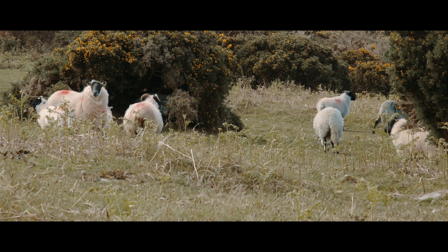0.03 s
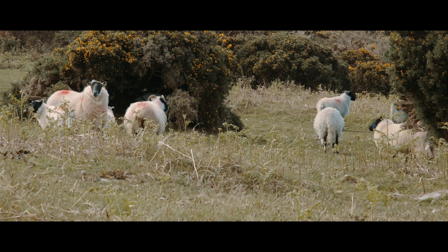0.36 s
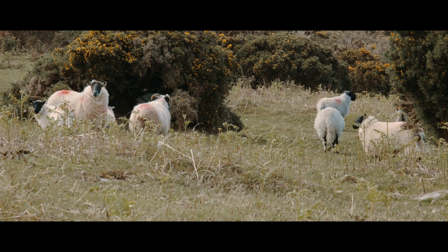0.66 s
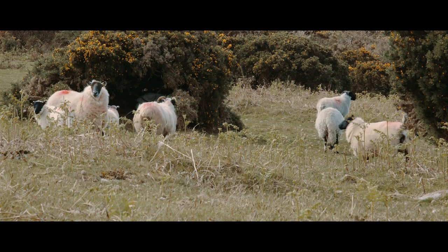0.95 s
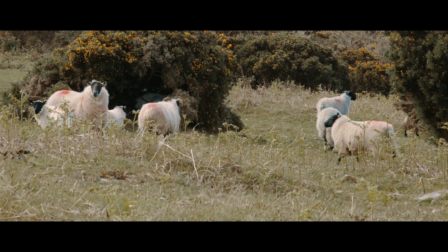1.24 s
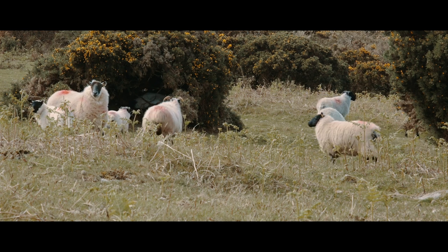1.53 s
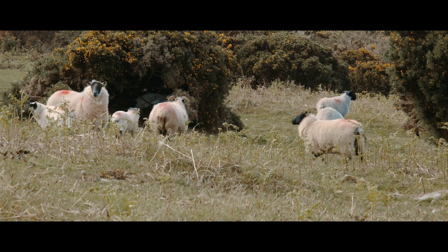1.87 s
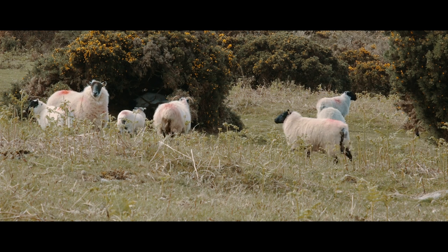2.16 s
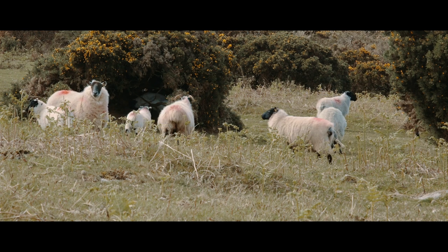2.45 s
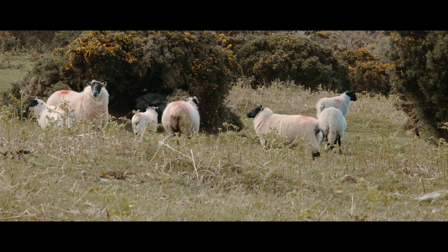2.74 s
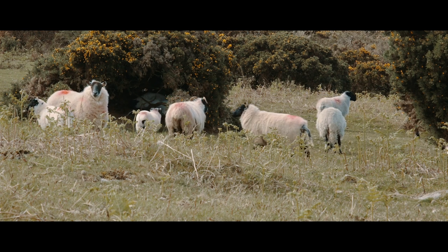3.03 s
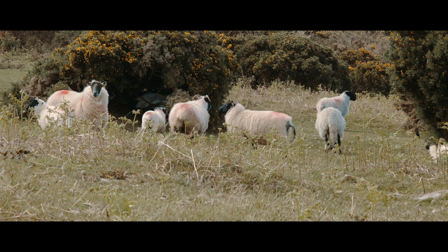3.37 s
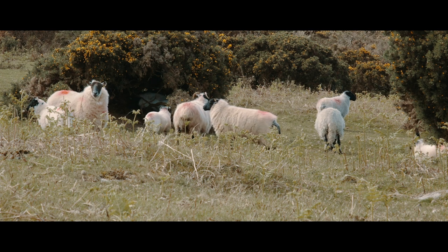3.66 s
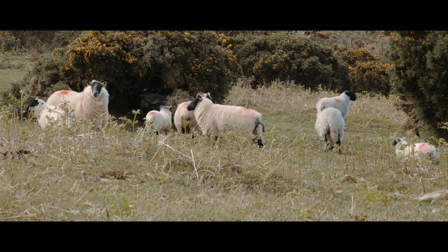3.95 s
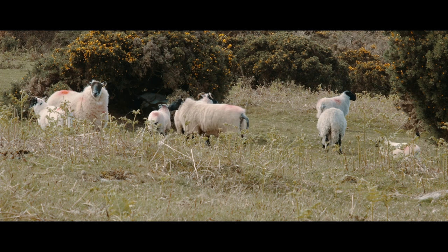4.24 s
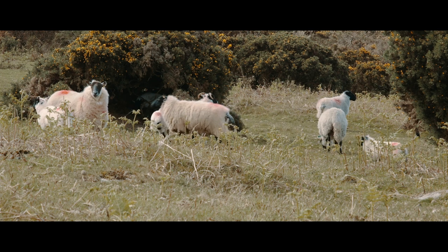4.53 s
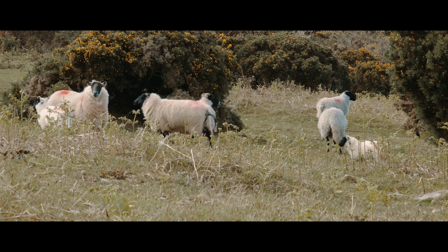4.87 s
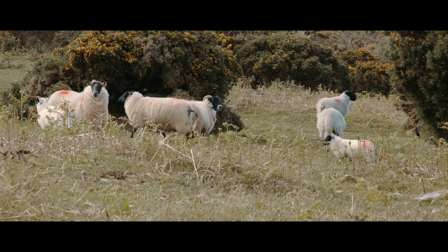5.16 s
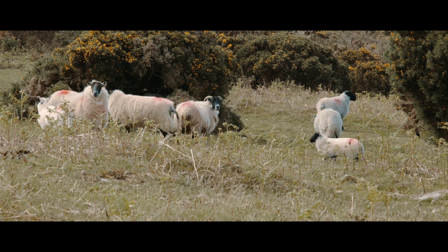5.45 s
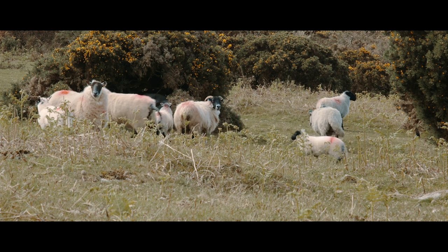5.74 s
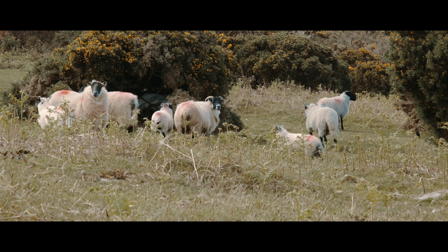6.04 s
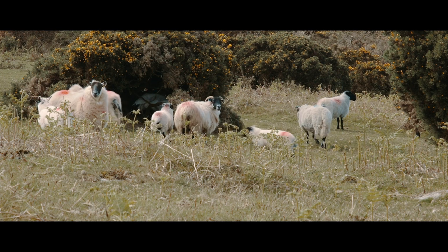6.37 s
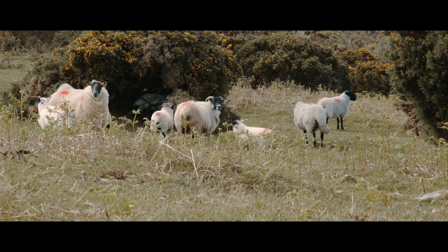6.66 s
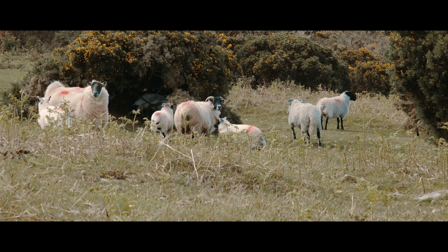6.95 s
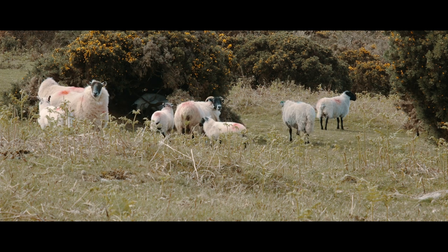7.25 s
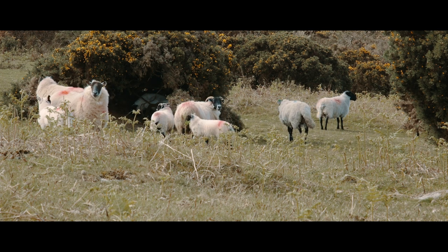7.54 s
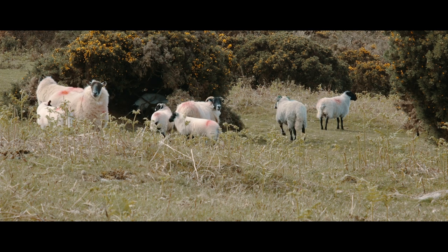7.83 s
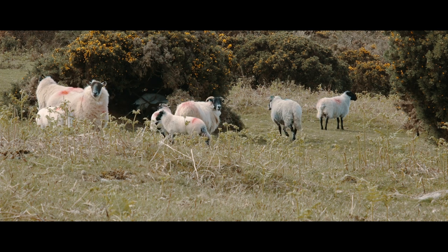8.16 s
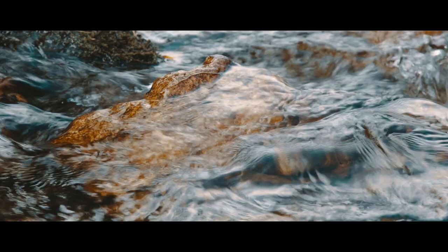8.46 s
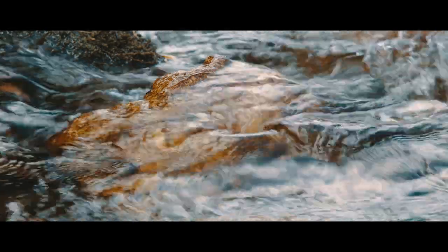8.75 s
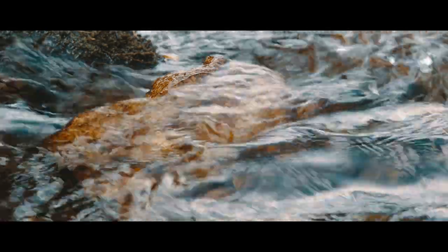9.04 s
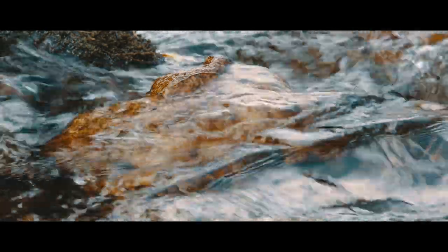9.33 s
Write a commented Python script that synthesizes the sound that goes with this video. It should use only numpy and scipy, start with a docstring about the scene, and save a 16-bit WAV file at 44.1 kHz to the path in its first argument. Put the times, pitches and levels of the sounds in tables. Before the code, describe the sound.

Sheep call in the open air over a faint hush, with small birds whistling near and far. Short mutters lead to two wavering bleats, one bright and one low, while a far sheep calls dully behind them. A lamb then bleats loudly, fairly near the microphone, followed by quick bird trills. Near the end these give way to a close stream gurgling over stones with small splashes.

```python
"""Sheep and birds on a moor

Sheep bleat in the open air while small birds whistle from the bushes and a far sheep keeps calling.
Each bleat is a string of throbs: quick puffs from the vocal folds ring in the throat, with slow
creaks in between. Near the end the animals fall silent and a shallow stream fades in,
its trapped air ringing as bubbles and its drops splashing over the stones."""
import sys
import numpy as np
from scipy import signal
from scipy.fft import rfft, irfft
from scipy.io import wavfile

SR = 44100
rng = np.random.default_rng(int(sys.argv[2]) if len(sys.argv) > 2 else 0)


def unload_audio(sound):
    """Save the sound as a 16-bit wav file, at the path given as the first command line argument."""
    columns = np.transpose(np.atleast_2d(sound))
    # keep every value between -1 and 1, then stretch to whole-number steps
    steps = np.round(np.clip(columns, -1, 1) * 32767)
    wavfile.write(sys.argv[1], SR, steps.astype(np.int16))


N = 423360
TIME = np.arange(N) / SR
STREAM_START_S = 8.15


def from_db(db):
    """Turn decibels into a number to multiply by."""
    return 10 ** (np.asarray(db) / 20)


def rms_one(x):
    """Scale a sound to an average power of 1."""
    return x / np.sqrt(np.mean(x ** 2) + 1e-20)


def add(out, s, sound):
    """Mix a sound in at s seconds."""
    i = int(np.clip(s * SR, 0, N))
    out[i:i + len(sound)] += sound[:N - i]


def seconds(length):
    """The time of each sample in a sound of this length."""
    return np.arange(int(length * SR)) / SR


def sine(hz):
    """A pure tone that follows a changing pitch."""
    return np.sin(2 * np.pi * np.cumsum(hz) / SR)


def drift(rate, size=N):
    """A random wander, roughly between -1 and 1, with `rate` new values a second."""
    return np.interp(np.arange(size) / SR * rate, np.arange(4096), rng.standard_normal(4096))


def colour(x, spectrum):
    """Make each frequency louder or softer along a smooth curve."""
    hz, db = np.transpose(spectrum)
    bins = np.maximum(np.fft.rfftfreq(N, 1 / SR), 1)
    return irfft(rfft(x) * from_db(np.interp(np.log(bins), np.log(hz), db)), N)


def resonance(x, hz, width):
    """Keep a band of frequencies around hz."""
    r = np.exp(-np.pi * width / SR)
    gain = (1 - r * r) / 2
    return signal.lfilter([gain, 0, -gain], [1, -2 * r * np.cos(2 * np.pi * hz / SR), r * r], x + 1e-18)


def noise_bursts(clicks, fade_s):
    """Turn each click into a short, fading hiss."""
    envelope = signal.lfilter([1], [1, -np.exp(-1 / (fade_s * SR))], clicks + 1e-18)
    return envelope * rng.standard_normal(N)


def open_air(x, wet_db, t60):
    """Bushes and slopes scatter a thin echo, which falls by 60 dB in t60 seconds."""
    t = seconds(.6)
    tail = rng.standard_normal(len(t)) * from_db(-60 * t / t60) * (1 - np.exp(-t / 0.014))
    return x + from_db(wet_db) * signal.fftconvolve(x, tail / np.sqrt(np.sum(tail ** 2)))[:N]


# The tone of still air and a wash of distant birdsong: f/Hz, relative level/dB
AIR_SPECTRUM = [(15, -47), (25, -16.5), (55, -5.5), (126, -2.5), (160, -5.5), (183, -7), (389, -11.5),
                (631, -11), (741, -10.5), (1110, -11), (1200, -13.5), (1710, -18), (2170, -18.5),
                (4870, -27), (7100, -28.5), (15500, -32.5)]


def moor_air(level_db=-55, dip_db=-4):
    """A soft, low hush that drops a little as the stream comes in."""
    hush = rms_one(colour(rng.standard_normal(N), AIR_SPECTRUM))
    return from_db(level_db + np.interp(TIME, [8.2, 8.8], [0, dip_db])) * hush


def warble(size, hz):
    """A ragged shake of the pitch: its speed and depth keep changing."""
    rate = hz * np.exp(.4 * drift(70, size))
    depth = 1 + .35 * drift(90, size)
    grit = .4 * drift(450, size)
    return depth * sine(rate) + grit


def whistles(notes, warble_hz=70, flutter_db=3.5, attack_s=0.0049, release_s=0.0057):
    """Each bird note is a pure tone gliding through three pitches while its level flutters."""
    out = np.zeros(N)
    for start, length, first_hz, middle_hz, last_hz, db, depth_hz in notes:
        t = seconds(length)
        glide = np.polyval(np.polyfit([0, .5, 1], [first_hz, middle_hz, last_hz], 2), t / length)
        pitch = glide + depth_hz * warble(len(t), warble_hz)
        level = from_db(db + flutter_db * drift(133, len(t)))
        envelope = np.minimum(t / attack_s, 1) * np.minimum((length - t) / release_s, 1)
        add(out, start, np.sqrt(2) * level * envelope * sine(pitch))
    return out


# How loud the distant birds are over time: t/s, level/dB
CHORUS_LEVELS = [(0, -61), (1, -61), (3, -60), (4.2, -75.5), (5, -56.5), (6.3, -63.5), (8.2, -69)]


def far_birds(spread_db=3, pitch_hz=3400, count=220):
    """Faint chirps from all over the moor, busiest at first."""
    notes = []
    for when, length, height, bend, slope, loud in rng.random((count, 6)):
        start = 8.2 * when ** 1.4
        hz = pitch_hz * 2 ** (.7 * (height - .5))
        glide = hz * (.75 + .5 * slope), hz * (.9 + .2 * bend), hz * (1.25 - .5 * slope)
        db = np.interp(start, *np.transpose(CHORUS_LEVELS)) + spread_db * (2 * loud - 1)
        notes.append((start, .02 + 0.049 * length, *glide, db, 70))
    return whistles(notes)


def throat(pulses, modes, top_hz):
    """Puffs of air make the throat ring at its own frequencies; little passes above top_hz."""
    bins = np.fft.rfftfreq(4096, 1 / SR)
    power = sum(from_db(2 * db) / (1 + ((bins - hz) / width) ** 2) ** 2.6 for hz, width, db in modes)
    power = power / (1 + (bins / top_hz) ** 16) + 1e-9
    # shape the ring so that it strikes at once and then dies away (minimum phase)
    cepstrum = irfft(np.log(power))
    ring = irfft(np.exp(rfft(cepstrum * (np.arange(len(cepstrum)) < len(bins)))))
    ring /= np.sqrt(np.sum(ring ** 2) * 200 / SR)  # 200 unit pulses a second give a power near 1
    return signal.fftconvolve(pulses, ring)[:N]


# Where the far sheep's throat rings: f/Hz, width/Hz, level/dB
FAR_SHEEP_THROAT = [(994, 71, 0.56), (1660, 150, 0.56), (1970, 92, 6.2)]
# Its calls: t/s, level/dB
FAR_SHEEP_CALLS = [(1.85, -52.5), (2.69, -54.5), (3.59, -56), (4.62, -54)]


def far_sheep(waver=.016, length_s=0.42, pitch_hz=147, scoop_hz=16, scoop_s=.05, sag_hz=17,
              attack_s=0.021, release_s=0.074):
    """A plain call that slides up to its pitch and sags, dulled by distance."""
    out, t = np.zeros(N), seconds(length_s)
    pitch = pitch_hz - scoop_hz * np.exp(-t / scoop_s) - sag_hz * (t / length_s) ** 2
    envelope = np.minimum(t / attack_s, 1) * np.minimum((length_s - t) / release_s, 1)
    for start, db in FAR_SHEEP_CALLS:
        cycles = np.cumsum(pitch * (1 + waver * drift(90, len(t)))) / SR
        pulses = np.diff(np.floor(cycles), prepend=0)  # one puff per cycle
        add(out, start, pulses * from_db(db) * envelope)
    return throat(out, FAR_SHEEP_THROAT, top_hz=2480)


def bubble(hz, t60, rise):
    """An air pocket rings and climbs in pitch as it nears the surface."""
    t = seconds(t60)
    return sine(hz * (1 + rise * t / t60)) * from_db(-60 * t / t60) * (1 - np.exp(-t * hz))


def bubbling(low_hz, high_hz, cycles, rise, spread_db, count):
    """Bubbles of all sizes, born at random while the stream runs."""
    out = np.zeros(N)
    for when, size, loud, life in rng.random((count, 4)):
        start = STREAM_START_S + when * (N / SR - STREAM_START_S)
        hz = low_hz * (high_hz / low_hz) ** size
        strength = hz * from_db(spread_db * min(-np.log(1 - loud), 4))
        add(out, start, strength * bubble(hz, cycles * (.5 + life) / hz, rise * life))
    # as strong as plain white noise is between these two frequencies
    return out / np.std(out[int(STREAM_START_S * SR):]) * np.sqrt(2 * (high_hz - low_hz) / SR)


def droplets(per_s=500, spread_db=5, fade_s=0.00085):
    """Flung drops tick on the water, a few of them loudly."""
    sizes = from_db(spread_db * np.minimum(rng.exponential(1, N), 4))
    ticks = noise_bursts(sizes * (rng.random(N) < per_s / SR), fade_s)
    return rms_one(signal.sosfilt(signal.butter(2, 2000, "high", fs=SR, output="sos"), ticks))


# The tone of the running water: f/Hz, relative level/dB
STREAM_SPECTRUM = [(150, -49), (250, -12), (436, -11), (616, -2), (934, -6), (1250, -5.5), (1470, -8),
                   (1780, -9.5), (2740, -11), (3200, -14.5), (4010, -15.5), (4770, -15.5), (6640, -17),
                   (13100, -22.5), (15800, -32)]


def stream(level_db=-30, fade_in_s=0.55, surge_db=3, low_cut_hz=250):
    """Rushing water, ringing bubbles and surges of fine spray fade in, then run steadily."""
    gurgles = from_db(-3) * bubbling(502.8, 2212, cycles=94, rise=0.23, spread_db=3, count=140)
    bubbles = from_db(-3) * bubbling(445.7, 3570, cycles=30, rise=0.22, spread_db=4, count=1200)
    spray = from_db(-4) * bubbling(2870, 14700, cycles=18, rise=0.1, spread_db=4.2, count=2000)
    surge = from_db(surge_db * drift(70))
    drops = from_db(-6) * droplets()
    rush = from_db(-9) * rng.standard_normal(N)
    water = colour(gurgles + bubbles + surge * (spray + drops + rush), STREAM_SPECTRUM)
    water = signal.sosfilt(signal.butter(3, low_cut_hz, "high", fs=SR, output="sos"), water)
    fade = np.clip((TIME - STREAM_START_S) / fade_in_s, 0, 1) ** 1.5
    return water / np.std(water[int(STREAM_START_S * SR):]) * from_db(level_db) * fade


# The loudest drops and the bubbles they trap: t/s, level/dB, f/Hz
BIG_DROPS = [(8.5462, -16.5, 2260), (8.5996, -22, 2920), (8.7904, -24, 2610), (8.9279, -10, 3220),
             (8.9368, -10, 4670), (8.948, -18, 2900), (9.2287, -17, 2040), (9.338, -14.5, 5670),
             (9.3492, -12, 4800), (9.4294, -7.5, 3080)]


def splashes(slap_s=0.00052, slap_db=1.5, ring_db=-2, cycles=30):
    """A drop slaps the water and traps a small, ringing bubble."""
    out, t = np.zeros(N), seconds(.02)
    for start, db, hz in BIG_DROPS:
        slap = resonance(rng.standard_normal(len(t)) * np.exp(-t / slap_s), hz=4600, width=7000)
        add(out, start, from_db(db + slap_db) * slap)
        add(out, start, from_db(db + ring_db) * bubble(hz, cycles / hz, rise=0.13))
    return out


# The largest air pockets: t/s, level/dB, f/Hz
AIR_POCKETS = [(8.623, -16.5, 1210), (8.75, -21, 641), (8.805, -27, 576), (8.937, -20, 1020),
               (9.107, -17.5, 456), (9.185, -16.5, 1080), (9.29, -20, 613), (9.49, -18, 656),
               (9.507, -17.5, 970)]


def gulps():
    """Air pockets gulp behind the stones; larger, deeper ones ring longer."""
    out = np.zeros(N)
    for start, db, hz in AIR_POCKETS:
        add(out, start, from_db(db) * bubble(hz, t60=0.079 * (700 / hz) ** 1.66, rise=0.13))
    return out


def song(syllable, phrases, hurry=0, vary=0.01, warble_hz=70, attack_s=0.0069, release_s=0.0051):
    """A bird repeats one syllable, never quite the same; `hurry` above 0 speeds up, below 0 slows."""
    notes = []
    for first, last, count, first_pitch, last_pitch, first_db, last_db in phrases:
        for along in np.linspace(0, 1, round(count)):
            start = first + (last - first) * (along + hurry * along * (1 - along ** 2))
            pitch = first_pitch + (last_pitch - first_pitch) * along
            pitch *= 1 + vary * rng.standard_normal()
            db = first_db + (last_db - first_db) * along
            for delay, length, *glide, note_db, depth_hz in syllable:
                notes.append((start + delay, length, *(pitch * np.array(glide)), db + note_db, depth_hz))
    return whistles(notes, warble_hz=warble_hz, attack_s=attack_s, release_s=release_s)


# Syllables, the building blocks of a song, one quick whistle a row:
# delay/s, length/s, first f/Hz, middle f/Hz, last f/Hz, level/dB, warble depth/Hz
LILT_SYLLABLE = [(.003, 0.0165, 3310, 4010, 4400, -9.5, 0), (.026, 0.023, 5000, 3900, 3280, -10.5, 0),
                 (.042, .029, 2700, 3054, 3500, -5, 56), (.066, 0.025, 2600, 2420, 2075, -12, -7)]
TRILL_SYLLABLE = [(.001, 0.0228, 4410, 4020, 3720, -7.5, 530), (.017, 0.0195, 3630, 3053, 2640, -1.5, 50)]
FLOURISH_SYLLABLE = [(0, 0.021, 4300, 5120, 3000, -17.5, 100), (.02, 0.0294, 2766, 3270, 3300, -1, 44),
                     (.05, 0.02, 4950, 3820, 3400, -2.5, 9), (.07, .036, 3300, 2850, 2250, -6, 92)]
SLUR_SYLLABLE = [(0, 0.042, 5340, 4600, 4500, 0.5, 0.0053), (.04, 0.026, 5230, 5350, 5300, -8, 0)]
SCOOP_SYLLABLE = [(-.008, 0.0114, 4730, 5800, 6100, -1, 200), (0, .047, 5700, 3520, 4460, 0.5, 265)]
SEEP_SYLLABLE = [(0, .035, 7850, 8400, 9800, 0, 150)]
# Phrases that repeat a syllable:
# first t/s, last t/s, syllables, first pitch ratio, last pitch ratio, first level/dB, last level/dB
LILT_PHRASES = [(0.469, 1.25, 7, 0.98, 1.01, -41, -40.5)]
TRILL_PHRASES = [(0.07, 0.237, 3, 1.4, 1.2, -61, -51.5), (7.085, 7.705, 11, 1.033, 1.01, -38, -37.5)]
FLOURISH_PHRASES = [(1.466, 1.467, 1, 0.99, 1.05, -44, -42), (7.773, 8.245, 4, 1.03, .975, -33.5, -36)]
SLUR_PHRASES = [(6.421, 6.565, 2, 0.98, 1, -38.5, -41), (6.629, 6.911, 3, 1.01, 1, -41.5, -39)]
SCOOP_PHRASES = [(4.41, 4.595, 2, 2, 1.65, -66, -55), (4.736, 4.735, 1, 1.13, 1.09, -46, -47),
                 (4.95, 5.015, 3, 1.01, 0.98, -37, -44.5), (5.126, 5.172, 2, 1.1, 1.1, -37.5, -34),
                 (5.279, 5.413, 4, 1.03, .62, -35.5, -54.5), (6.36, 6.497, 2, 1.02, 1.08, -36, -34.5)]
SEEP_PHRASES = [(3.128, 3.552, 4, 0.92, 0.91, -57.5, -62)]


def bird_songs():
    """Six kinds of song, whistled from the nearby bushes."""
    return (song(LILT_SYLLABLE, LILT_PHRASES, hurry=.083)
            + song(TRILL_SYLLABLE, TRILL_PHRASES, warble_hz=166.5)
            + song(FLOURISH_SYLLABLE, FLOURISH_PHRASES, attack_s=0.007)
            + song(SLUR_SYLLABLE, SLUR_PHRASES)
            + song(SCOOP_SYLLABLE, SCOOP_PHRASES, warble_hz=84.7, attack_s=0.021, release_s=0.0071)
            + song(SEEP_SYLLABLE, SEEP_PHRASES, hurry=-0.33))


# Single sliding notes: t/s, length/s, first f/Hz, last f/Hz, level/dB, warble depth/Hz
BIRD_SLIDES = [(0.332, 0.069, 3950, 2900, -52, 392), (1.791, 0.038, 3150, 3000, -41, 200),
               (1.858, .05, 5100, 4240, -46, 450), (1.993, .15, 2880, 3950, -44, 200),
               (2.639, 0.1, 3460, 3350, -51.5, 53), (2.689, 0.13, 4020, 3700, -51.5, 100),
               (3.666, .077, 3545, 3620, -49, 30), (3.741, 0.074, 3030, 3180, -49.5, 30),
               (3.825, .037, 3780, 3940, -48.5, 0), (3.908, 0.053, 3760, 3690, -54.5, 0),
               (3.964, .17, 2840, 2720, -58.5, 0), (4.809, 0.015, 4300, 4500, -38, 200),
               (4.833, 0.032, 5700, 2580, -40.5, 100), (5.84, 0.027, 2800, 4600, -35.5, -2),
               (5.86, 0.041, 4280, 4320, -32, 64), (5.899, 0.034, 4500, 4220, -30.5, 100),
               (6.671, 0.049, 3930, 3710, -33.5, -2), (8.146, 0.12, 4435, 4120, -57.5, 0)]
# Thin whistles with two voices: t/s, length/s, lower f/Hz, level/dB
BIRD_DOUBLES = [(2.747, 0.21, 3440, -63), (5.524, 0.22, 3900, -56), (6.022, 0.221, 4090, -52.5)]


def bird_calls(upper_ratio=1.075, upper_db=-2, rise=0.0394):
    """Lone slides, and rising double notes sung with both sides of a bird's voice box."""
    notes = [(start, length, first, (first + last) / 2, last, db, depth_hz)
             for start, length, first, last, db, depth_hz in BIRD_SLIDES]
    for start, length, lower_hz, db in BIRD_DOUBLES:
        for hz, voice_db in (lower_hz, db), (lower_hz * upper_ratio, db + upper_db):
            notes.append((start, length, hz * (1 - rise), hz, hz, voice_db, 25))
    return whistles(notes, warble_hz=112.2, attack_s=0.0072, release_s=0.01)


def throbs(bleats, sag_hz_per_s, attack_s, release_s, open_s, shut_s, creak_db, limp_db, uneven_db=1):
    """Plan the throbs: a bleat swells and fades as its pitch sags; every second throb creaks harder."""
    rows = []
    for first, last, count, first_hz, db, soft_start_db, soft_end_db in bleats:
        for k, peak in enumerate(np.linspace(first, last, round(count))):
            timing, strength = rng.standard_normal(2)
            start = peak - open_s * (1 + .05 * timing)
            hz = first_hz - sag_hz_per_s * (peak - first)
            effort_db = db - soft_start_db * np.exp((first - peak) / attack_s)
            effort_db -= soft_end_db * np.exp((peak - last) / release_s)
            peak_db = effort_db + uneven_db * strength
            opening_db = effort_db + creak_db - limp_db * (-1) ** k
            rows.append((start, peak, peak + shut_s, hz, peak_db, opening_db))
    return rows


def bleat(plan, modes, top_hz, creak_hz, creak_fall_db, swell_s, close_db, jitter, shimmer_db, rasp):
    """Each throb opens with slow, fading creaks; then the vocal folds speed up, swell and shut."""
    pulses = np.zeros(N)
    for start, peak, end, hz, peak_db, opening_db in plan:
        s = start
        for k, (timing, strength) in enumerate(rng.standard_normal((40, 2))):
            if s > end:
                break
            from_peak = (peak - s) / swell_s if s < peak else (s - peak) / max(end - peak, 1e-3)
            voiced_db = peak_db - close_db * from_peak ** 2
            creaky_db = opening_db - creak_fall_db * k
            # shimmer makes the puffs uneven in level, jitter makes them uneven in time
            pulses[int(s * SR)] += from_db(max(voiced_db, creaky_db) + shimmer_db * strength)
            s += (1 + jitter * timing) / (creak_hz if creaky_db > voiced_db else hz)
    breath = rms_one(noise_bursts(pulses, fade_s=0.0021))  # air hisses through just after each puff
    return throat(pulses + rasp * np.std(pulses) * breath, modes, top_hz)


# Murmurs, timed by the peaks of their throbs:
# first t/s, last t/s, throbs, f/Hz, level/dB, softer start/dB, softer end/dB
MURMUR_BLEATS = [(.615, .85, 3, 198, -55.5, 0, 10), (5.135, 5.315, 3, 160.6, -53.5, 0.0098, 3),
                 (5.63, 5.63, 1, 174, -61, 0, 0), (6.30, 6.30, 1, 199.7, -52.5, 0, 1)]
# Where a sheep's chest and nose ring: f/Hz, width/Hz, level/dB
NOSE_RINGS = [(173, 65, 0), (213, 110, -4)]


def murmur():
    """A sheep hums with its mouth shut, so only the chest and nose ring."""
    plan = throbs(MURMUR_BLEATS, sag_hz_per_s=7, attack_s=.1, release_s=.08,
                  open_s=.04, shut_s=0.024, creak_db=-12, limp_db=0)
    return bleat(plan, NOSE_RINGS, top_hz=600, creak_hz=117.4, creak_fall_db=1.5,
                 swell_s=0.036, close_db=9, jitter=0.11, shimmer_db=2, rasp=1.0)


# Mutters: first t/s, last t/s, throbs, f/Hz, level/dB, softer start/dB, softer end/dB
MUTTER_BLEATS = [(1.606, 1.606, 1, 186, -46.5, -3.5, 0), (1.70, 1.803, 3, 170.5, -38.5, 9.5, 0),
                 (5.142, 5.318, 3, 151, -50, 6, 2), (6.135, 6.135, 1, 141, -48.5, 3.5, 0),
                 (7.262, 7.475, 3, 140, -40, 14, 0.64)]
# Where the muttering throat rings: f/Hz, width/Hz, level/dB
MUTTER_RINGS = [(174, 100, 3), (600, 170, -19.5), (1200, 410, -3.5), (1510, 160, -8.5), (2370, 300, 3.5),
                (3020, 920, -0.5), (4600, 590, -25), (5870, 330, -11)]


def mutter():
    """Short, rough bleats of just one to three throbs."""
    plan = throbs(MUTTER_BLEATS, sag_hz_per_s=20, attack_s=0.11, release_s=.06,
                  open_s=.024, shut_s=0.019, creak_db=-5.5, limp_db=-2)
    return bleat(plan, MUTTER_RINGS, top_hz=6540, creak_hz=94.5, creak_fall_db=7,
                 swell_s=0.029, close_db=18, jitter=.1, shimmer_db=3.5, rasp=0.35)


# The ewe's bleat: first t/s, last t/s, throbs, f/Hz, level/dB, softer start/dB, softer end/dB
EWE_BLEATS = [(3.139, 3.678, 8, 162.4, -40, 8.9, 0.83)]
# Where her throat rings: f/Hz, width/Hz, level/dB
EWE_RINGS = [(177, 57, 2), (287, 58, -2), (1090, 170, -1.5), (2190, 230, -7.5), (3170, 750, -4),
             (4540, 1400, -10.5), (5590, 160, -4)]


def ewe(mouth_db=-1, nose_db=-5):
    """A grown female sheep bleats low and hums through her nose on every throb."""
    plan = throbs(EWE_BLEATS, sag_hz_per_s=20, attack_s=0.15, release_s=.06,
                  open_s=.032, shut_s=0.024, creak_db=-5, limp_db=0.5)
    mouth = bleat(plan, EWE_RINGS, top_hz=5900, creak_hz=133.8, creak_fall_db=9,
                  swell_s=0.029, close_db=17, jitter=.1, shimmer_db=2.6, rasp=0.44)
    nose = bleat(plan, NOSE_RINGS, top_hz=600, creak_hz=136.7, creak_fall_db=9,
                 swell_s=0.0149, close_db=17, jitter=.2, shimmer_db=-3, rasp=0.49)
    return from_db(mouth_db) * mouth + from_db(nose_db) * nose


# The young sheep's bleats: first t/s, last t/s, throbs, f/Hz, level/dB, softer start/dB, softer end/dB
YOUNG_BLEATS = [(1.925, 2.003, 2, 179.3, -44, 1.8, 0), (2.082, 2.553, 7, 207, -33.5, 4.1, 0.093)]
# Where its throat rings: f/Hz, width/Hz, level/dB
YOUNG_RINGS = [(178, 74, -5), (553, 94, -8), (1180, 300, -10.5), (1595, 140, 6), (2645, 310, 3.5),
               (3440, 180, 5), (3900, 250, 8), (4220, 220, 3), (4980, 310, -8), (6740, 450, -6.5),
               (8600, 820, -16), (9630, 1070, -11.5)]


def young_sheep():
    """A year-old sheep gives two soft throbs, then a bright, breathy bleat."""
    plan = throbs(YOUNG_BLEATS, sag_hz_per_s=20, attack_s=0.23, release_s=.085,
                  open_s=.043, shut_s=0.022, creak_db=-5, limp_db=3)
    return bleat(plan, YOUNG_RINGS, top_hz=10500, creak_hz=109, creak_fall_db=15,
                 swell_s=0.033, close_db=17, jitter=.04, shimmer_db=1.5, rasp=0.61)


# The lamb's bleat: first t/s, last t/s, throbs, f/Hz, level/dB, softer start/dB, softer end/dB
LAMB_BLEATS = [(6.381, 7.045, 10, 234, -21, 12, 12)]
# Where its throat rings, and where air whistles in its half-open mouth: f/Hz, width/Hz, level/dB
LAMB_RINGS = [(701, 107, -8), (1810, 165, 1), (2706, 253, 7), (3333, 164, 11.5), (3910, 330, 0),
              (5350, 510, -17), (6740, 660, -24.5), (7780, 170, -19), (8830, 200, -22.5), (9700, 1300, -30)]
LAMB_MOUTH_RINGS = [(1310, 410, 0), (4700, 600, 11.5), (5830, 410, 4), (6770, 580, -5), (10300, 1800, -16)]


def lamb(voice_db=-1, hoarse_db=-14):
    """The loudest bleat: hoarse for three throbs as the mouth opens, then ringing."""
    plan = throbs(LAMB_BLEATS, sag_hz_per_s=42, attack_s=.11, release_s=.055,
                  open_s=.047, shut_s=.019, creak_db=-8, limp_db=3, uneven_db=.6)
    folds = dict(creak_hz=125, creak_fall_db=1.5, swell_s=.036, close_db=16, jitter=.03, shimmer_db=1)
    voice = bleat(plan, LAMB_RINGS, top_hz=12000, rasp=.18, **folds)
    hiss = bleat(plan[:3], LAMB_MOUTH_RINGS, top_hz=13000, rasp=0.55, **folds)
    return from_db(voice_db) * voice + from_db(hoarse_db) * hiss


def scene():
    """Mix air, animals and water into one channel; far animals get more echo than near ones."""
    flock = murmur() + mutter() + ewe() + young_sheep() + lamb()
    near = open_air(flock, wet_db=-19.5, t60=0.47)
    near += open_air(bird_songs() + bird_calls(), wet_db=-16.5, t60=0.53)
    far = open_air(far_sheep(), wet_db=-2.5, t60=0.57)
    far += from_db(-3) * open_air(far_birds(), wet_db=-3.5, t60=0.6)
    water = stream() + splashes() + gulps()
    return (moor_air() + far + water + near)[None]


def record(dry):
    """Cut the highest treble steeply, above 15900 Hz."""
    return signal.sosfilt(signal.ellip(10, .1, 70, 15900, fs=SR, output="sos"), dry)


dry = scene()
out = record(dry)
unload_audio(out)
```